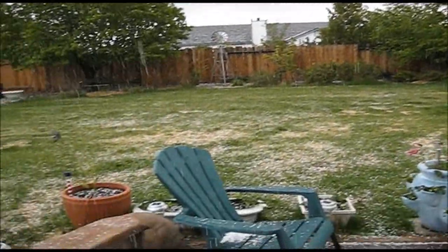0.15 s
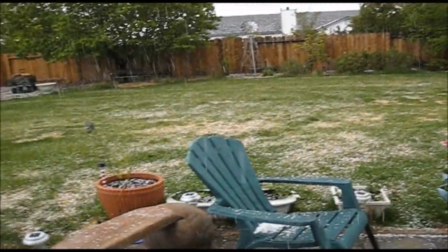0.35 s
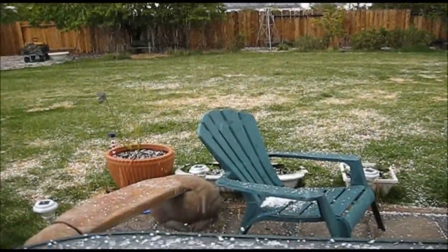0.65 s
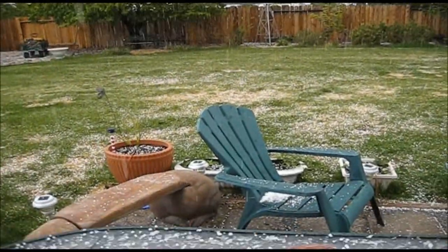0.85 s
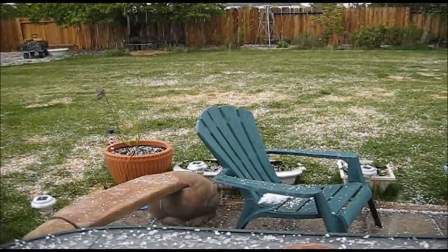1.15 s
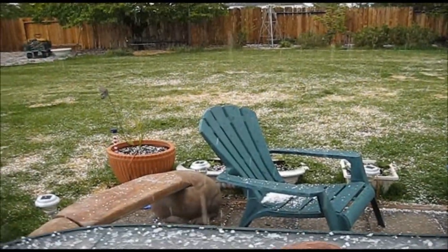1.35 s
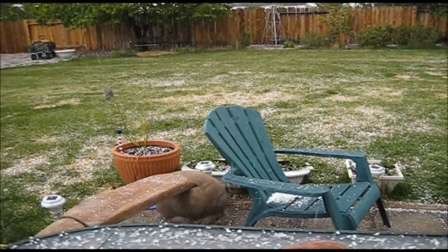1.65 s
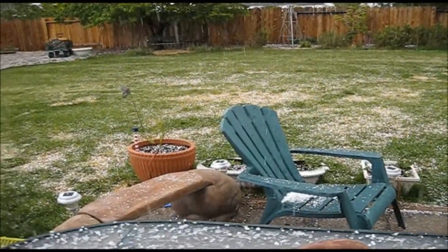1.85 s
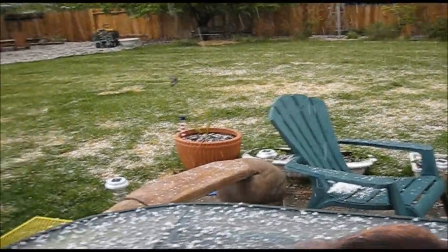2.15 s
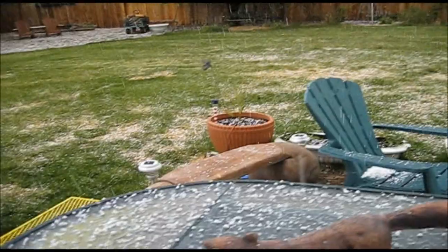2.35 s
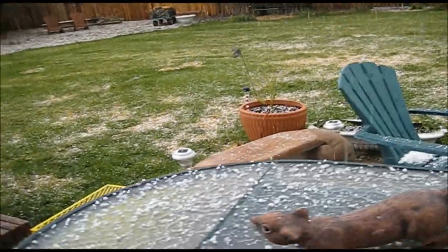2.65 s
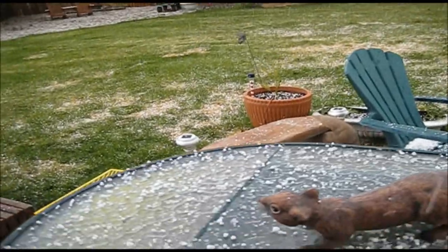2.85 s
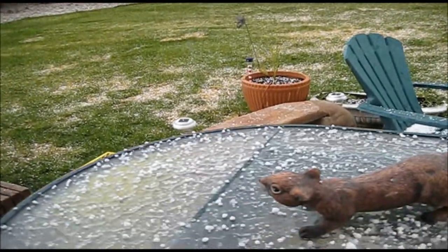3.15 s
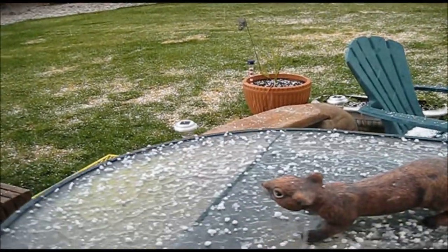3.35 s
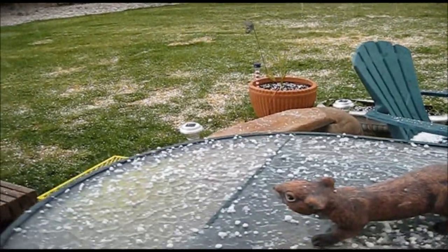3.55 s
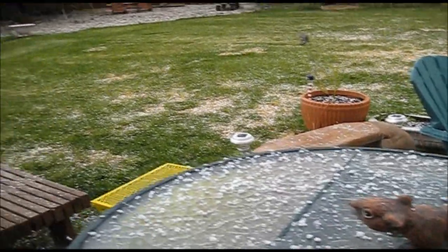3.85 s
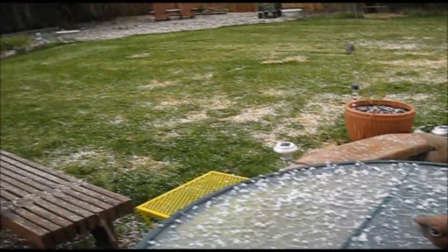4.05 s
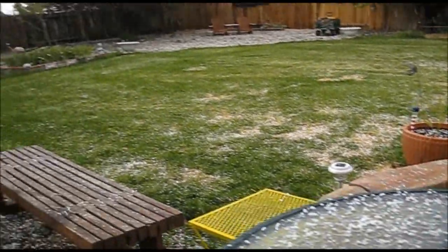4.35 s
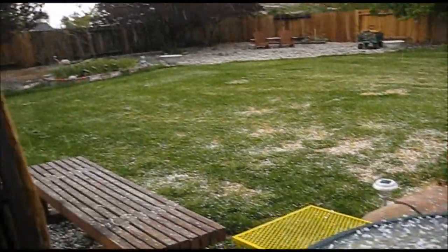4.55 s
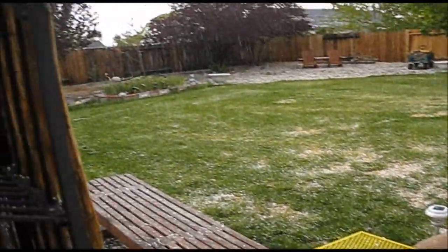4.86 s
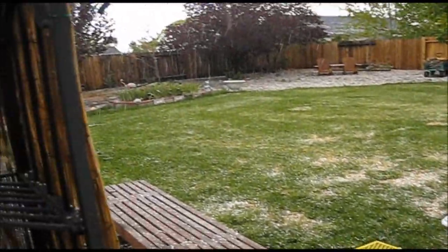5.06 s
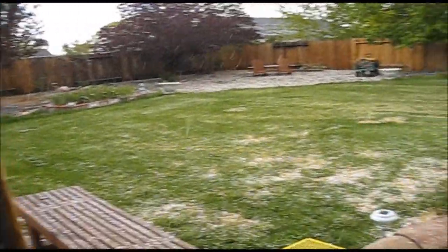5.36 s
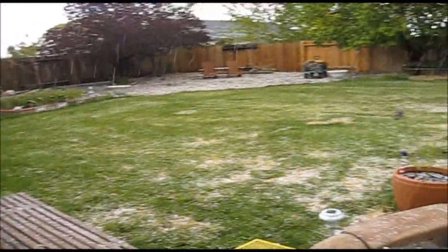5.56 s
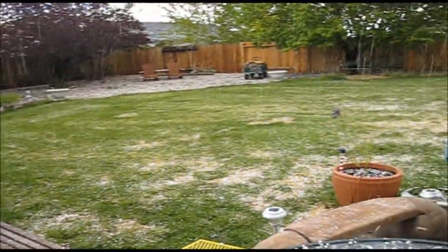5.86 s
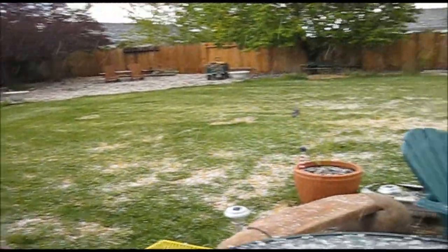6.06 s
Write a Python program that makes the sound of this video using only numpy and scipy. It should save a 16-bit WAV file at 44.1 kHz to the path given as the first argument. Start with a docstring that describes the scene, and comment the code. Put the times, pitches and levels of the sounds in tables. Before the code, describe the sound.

Ice pellets patter and tick on a patio table and garden furniture over the even hiss of hail on a lawn.

```python
"""Small hail on a back yard

Countless distant pellets hiss on the lawn; closer ones patter on the patio, clink on gravel, tap the fence.
Near stones click and crack. Some ring a pot, glass, tile or metal, thump, knock on furniture or shatter.
A limiter ducks the mix after each loud click; the treble has a narrow notch."""
import sys
import numpy as np
from scipy import signal
from scipy.fft import rfft, irfft, next_fast_len
from scipy.io import wavfile
from scipy.ndimage import uniform_filter1d, minimum_filter1d, map_coordinates

SR = 44100
rng = np.random.default_rng(int(sys.argv[2]) if len(sys.argv) > 2 else 0)


def waveform_to_disk(signal):
    """Save audio, clipped to [-1, 1], as 16-bit WAV at the path in sys.argv[1]."""
    frames = np.transpose(np.atleast_2d(signal))
    scaled = np.clip(frames, -1, 1) * 32767
    samples = np.round(scaled).astype(np.int16)
    wavfile.write(sys.argv[1], SR, samples)


N = 273420

# Shower strength. Each row: time in seconds, relative lawn hiss in dB, relative ice fizz in dB.
SHOWER_LEVELS = [(0.0, -28, -30), (1.47, -27, -31), (2.17, -28, -30), (3.02, -28.5, -31.5),
                 (3.35, -27.5, -27.5), (3.61, -27.5, -34), (5.02, -28.5, -31), (6.2, -28, -31.5)]
# Spectra of lawn hiss, ice fizz and impacts. Each row: frequency in Hz, gain in dB.
LAWN_SPECTRUM = [(20, -17.5), (60, -14.5), (150, -13), (300, -8), (600, -3.5), (1000, -1), (2500, 1.5),
                 (4500, -1), (7000, -6.5), (10000, -8.5), (16000, -22)]
FIZZ_SPECTRUM = [(2000, -23), (6000, 0), (9000, -5.5), (11700, 3), (13500, -5.5), (16000, -17)]
IMPACT_SPECTRUM = [(20, -8), (100, -1), (500, -2), (2000, 1.5), (7000, 3), (12000, 2), (13500, -1.5),
                   (16000, -14.5)]
# Loudest near stones. Each row: start in seconds, click pitch in Hz, relative click and crack levels in dB.
NEAR_STONES = [(.261, 4100, -18.5, -11), (.341, 4580, -17.5, -20), (.42, 5960, -25, -12),
               (.648, 5100, -23, -19), (.6845, 3760, -11.5, -13.5), (.7866, 5000, -21, -22),
               (.8255, 4640, -18, -9), (.9256, 4540, -11.5, -21), (.945, 5500, -20, -11.5),
               (.9905, 3700, -20, -30), (1.195, 4800, -17, -11.5), (1.372, 5100, -31, -11.5),
               (1.4225, 5700, -21, -15), (1.487, 4600, -22, -11), (1.531, 4800, -17, -16),
               (1.711, 4600, -37, -14.5), (1.865, 4500, -41, -17), (1.9965, 6700, -15, -12.5),
               (2.122, 5000, -18, -10.5), (2.171, 5600, -25, -11), (2.219, 4970, -21, -10.5),
               (2.2424, 4170, -18, -9), (2.3128, 5100, -15, -23), (2.339, 4940, -14.5, -34),
               (2.38, 4870, -18.5, -33), (2.4256, 4940, -13.5, -10.5), (2.436, 4900, -18, -22),
               (2.7437, 4800, -24, -9), (2.834, 4830, -15, -12), (3.057, 4600, -28, -18),
               (3.3915, 4500, -11, -13), (3.5408, 4850, -17, -9.5), (3.631, 4140, -7.5, -12),
               (3.70, 4800, -34, -8.5), (3.7542, 4560, -12.5, -16.5), (3.9685, 5000, -22, -17.5),
               (4.0447, 4900, -16.5, -18.5), (4.238, 4750, -16.5, -32), (4.317, 4800, -18, -12),
               (4.345, 4020, -17, -17), (4.4864, 4480, -17.5, -21), (4.6484, 4600, -11, -13),
               (4.762, 4580, -10, -8), (4.813, 5300, -23, -15.5), (4.883, 5300, -17, -12),
               (5.094, 5000, -20, -17), (5.206, 5800, -12, -18.5), (5.9124, 4700, -13.5, -13.5),
               (6.088, 4650, -13.5, -16), (6.125, 5000, -15, -16)]
# Stones that ring something. Each row: start in seconds, object struck, level in dB.
RING_STRIKES = [(.405, "glass", -19), (.475, "tile", -18), (.543, "glass", -16), (.70, "glass", -21),
                (1.195, "pot", -18.5), (2.803, "tile", -18), (3.729, "metal", -23), (3.857, "metal", -18.5),
                (4.345, "glass", -16), (5.292, "pot", -18.5), (5.489, "glass", -17), (5.672, "metal", -14)]
# One mode per object. Each entry: pitch in Hz, T60 in seconds.
RING_MODES = {"glass": (11600, 0.12), "tile": (6800, .07), "metal": (4680, 0.062), "pot": (2520, 0.092)}
# Thumps of the closest stones. Each row: start in seconds, relative level in dB.
LOW_THUMPS = [(0.686, -19), (1.713, -25), (1.806, -22), (2.835, -26), (3.391, -26), (3.63, -18),
              (4.762, -21), (6.126, -17)]
# Dull knocks on wood and plastic. Each row: start in seconds, pitch in Hz, level in dB.
FURNITURE_KNOCKS = [(.71, 560, -21.5), (1.585, 960, -24.5), (1.972, 610, -24), (2.581, 930, -21.5),
                    (2.635, 960, -21.5), (3.263, 790, -19.5), (3.63, 740, -19), (3.859, 990, -24),
                    (6.022, 1060, -23.5)]
# Stones that shatter and skitter. Each row: start in seconds, pitch in Hz, relative level in dB.
SHATTERS = [(.75, 11100, -19), (1.098, 11200, -17), (1.972, 3980, -19), (1.993, 10500, -22),
            (2.172, 11300, -15), (2.612, 3280, -19), (3.70, 10700, -17), (3.957, 3070, -23),
            (5.556, 10300, -19.5)]


def amp(db):
    """Decibels to gain."""
    return 10 ** (np.asarray(db) / 20)


def unit_rms(x):
    """Each row scaled to rms 1."""
    return x / np.sqrt(np.mean(x ** 2, axis=-1, keepdims=True) + 1e-20)


def filtered(x, response):
    """x times a frequency response."""
    n = x.shape[-1]
    padded = next_fast_len(n + n // 4)
    return irfft(rfft(x, padded) * response(np.fft.rfftfreq(padded, 1 / SR)), padded)[..., :n]


def coloured(x, spectrum):
    """x through a spectrum of (Hz, dB) points."""
    hz, db = np.transpose(spectrum)
    return filtered(x, lambda f: amp(np.interp(np.log(f + 1), np.log(hz), db)))


def resonance(f, hz, q):
    """Causal band-pass response."""
    return 1j * f * hz / q / (hz * hz - f * f + 1j * f * hz / q)


def wobble(rate_hz):
    """Smooth random curve."""
    knots = rng.standard_normal(int(N * rate_hz / SR) + 4)
    return map_coordinates(knots, [np.arange(N) * rate_hz / SR])


def placed(start_s, sounds):
    """Rows of sound summed at their start times."""
    index = np.round(np.abs(start_s) * SR).astype(int).reshape(-1, 1) + np.arange(sounds.shape[1])
    return np.bincount(index.ravel(), sounds.ravel(), N)[:N]


def contact(blow_s, scatter_db, scatter_t60_s):
    """Impact envelope: the pellet crushes in a short blow, then nearby surfaces scatter the sound."""
    t = np.arange(768) / SR
    crush = np.exp(-(t / blow_s) ** 2)
    scatter = amp(scatter_db - 60 * t / scatter_t60_s)
    return (crush + scatter) * (1 - np.exp(-t / .00027))


def bursts(envelope, hz, q):
    """Rough contacts through one resonance each; a row carries the energy of 3 ms at rms 1."""
    noise = envelope * rng.standard_normal(envelope.shape)
    band = filtered(noise, lambda f: resonance(f, hz, q))
    return unit_rms(band) * np.sqrt(.003 * SR / band.shape[1])


def shower_db(at_s):
    """A heavier shower lands harder: the fizz level about its mean."""
    time_s, _, fizz_db = np.transpose(SHOWER_LEVELS)
    return np.interp(at_s, time_s, fizz_db - fizz_db.mean())


def lawn_hiss():
    """Distant pellets merge into a grainy rush, with fine ice fizzing on top."""
    time_s, lawn_db, fizz_db = np.transpose(SHOWER_LEVELS)
    t = np.arange(N) / SR
    lawn = unit_rms(coloured(rng.standard_normal(N) * amp(1.47 * wobble(400)), LAWN_SPECTRUM))
    fizz = unit_rms(coloured(rng.standard_normal(N) * amp(3.6 * wobble(700)), FIZZ_SPECTRUM))
    lawn *= amp(np.interp(t, time_s, lawn_db) - .5 + 1.19 * wobble(25))
    fizz *= amp(np.interp(t, time_s, fizz_db) - 2.7 + 2.8 * wobble(40))
    return lawn + fizz


def patter(count, spread_db, crack_db, scatter_db, scatter_t60_s):
    """Pellets land at random; hard ones crack more and click less."""
    start_s = rng.uniform(0, N / SR, (count, 1))
    size, hardness, pitch, length = np.clip(rng.standard_normal((4, count, 1)), -2, 2)
    blow = contact(.00037 * np.exp(.5 * length), scatter_db, scatter_t60_s)
    click = amp(-2 * hardness) * bursts(blow, hz=4300 * np.exp(.3 * pitch), q=2.5)
    crack = amp(crack_db + 2.34 * hardness) * bursts(blow, hz=11000 * np.exp(.08 * pitch), q=3.4)
    return placed(start_s, amp(shower_db(start_s) + spread_db * size) * (click + crack))


def gravel_clinks(count, level_db):
    """Pellets on gravel and pots ring for a few milliseconds, each at its own pitch."""
    start_s, hz = rng.uniform((0, 1200), (N / SR, 13000), (count, 2)).T[:, :, None]
    size = np.clip(rng.standard_normal(start_s.shape), -2, 1.5)
    blow = contact(np.full(start_s.shape, .0005), scatter_db=-9, scatter_t60_s=.035)
    return placed(start_s, amp(level_db + 3 * size) * bursts(blow, hz, q=hz / 350))


def far_taps(count, level_db):
    """Dull taps on fence, roof and soil."""
    start_s = rng.uniform(0, N / SR, (count, 1))
    size, pitch = np.clip(rng.standard_normal((2, count, 1)), -2, 2)
    blow = contact(np.full(start_s.shape, .001), scatter_db=-2, scatter_t60_s=.029)
    return placed(start_s, amp(level_db + 3 * size) * bursts(blow, hz=1600 * np.exp(.6 * pitch), q=10))


def lesser_stone_rows(count):
    """Rows like NEAR_STONES, softer, with random size, hardness and pitch."""
    start_s = (np.arange(count) + rng.uniform(-1, 2, count)) * N / SR / count
    size, hardness, pitch = np.clip(rng.standard_normal((count, 3)), -1.3, 1.3).T
    size_db = shower_db(start_s) + 3.5 * size
    click_db = -25 + size_db - 2.5 * hardness
    crack_db = -22.5 + size_db + 2.5 * hardness
    return np.column_stack([start_s, 4700 * np.exp(.2 * pitch), click_db, crack_db])


def near_stones(rows, typical_blow_s):
    """Each stone gives a pitched click, a bright crack of ice and a faint thud."""
    start_s, hz, click_db, crack_db = np.array(rows).T[:, :, None]
    length, crack_pitch = np.clip(rng.standard_normal((len(rows), 2)), -1.5, 1.5).T[:, :, None]
    weight_db = click_db - click_db.mean()
    blow_s = typical_blow_s * np.exp(.2 * length + .12 * weight_db)  # heavier stones crush for longer
    blow = contact(blow_s, scatter_db=-12, scatter_t60_s=.02)
    click = amp(click_db) * bursts(blow, hz, q=2.13)
    crack = amp(crack_db) * bursts(blow, hz=11200 * np.exp(.05 * crack_pitch), q=2.95)
    thud = amp(click_db - 27) * bursts(blow, hz=430, q=.45)
    return placed(start_s, click + crack + thud)


def faint_ping_rows(count, level_db):
    """Rows like RING_STRIKES, with random times and objects."""
    return [(rng.uniform(0, N / SR), rng.choice(list(RING_MODES)), level_db) for _ in range(count)]


def pings(rows, pitch_spread):
    """A hard object rings on one mode, roughened by the pellet's chatter; pitch varies by strike."""
    strikes = [(start_s, db, *RING_MODES[struck]) for start_s, struck, db in rows]
    start_s, db, hz, t60_s = np.array(strikes).T[:, :, None]
    hz = hz * np.exp(pitch_spread * rng.uniform(-1.1, 1, hz.shape))
    t = np.arange(6000) / SR
    chatter_rad = .03 * np.cumsum(rng.standard_normal((len(rows), len(t))), axis=1)
    envelope = amp(db - 60 * t / t60_s) * (1 - np.exp(-t / .00018))
    return placed(start_s, envelope * np.sin(2 * np.pi * hz * t + chatter_rad))


def thumps(rise_s):
    """The closest stones give a low push to what they land on."""
    start_s, db = np.array(LOW_THUMPS).T[:, :, None]
    t = np.arange(2048) / SR
    push = t / rise_s * np.exp(-t / rise_s)
    return filtered(placed(start_s, amp(db) * push), lambda f: resonance(f, hz=303, q=.17))


def rattles(rows, t60_s, q):
    """Knock or shatter: dense contacts die away in one broad resonance."""
    start_s, hz, db = np.array(rows).T[:, :, None]
    t = np.arange(6000) / SR
    noise = rng.standard_normal((len(rows), len(t)))
    body = unit_rms(filtered(noise, lambda f: resonance(f, hz, q) ** 2))
    envelope = amp(db - 60 * t / t60_s) * (1 - np.exp(-t / .0011))
    return placed(start_s, envelope * body)


def scene():
    """Mono mix; farther pellets are softer and more numerous."""
    near = near_stones(NEAR_STONES, typical_blow_s=.0012)
    near += near_stones(lesser_stone_rows(count=105), typical_blow_s=.0009)
    patio = amp(-30) * patter(count=300, spread_db=2.5, crack_db=0, scatter_db=-11, scatter_t60_s=.03)
    gravel = gravel_clinks(count=420, level_db=-31)
    yard = amp(-38) * patter(count=1000, spread_db=5.5, crack_db=2.5, scatter_db=-9, scatter_t60_s=.043)
    shatters = rattles(SHATTERS, t60_s=.14, q=1.5)
    impacts = coloured(near + patio + gravel + yard + shatters, IMPACT_SPECTRUM)
    taps = far_taps(count=600, level_db=-40)
    knocks = rattles(FURNITURE_KNOCKS, t60_s=.053, q=.9)
    rings = pings(RING_STRIKES, pitch_spread=.014)
    rings += pings(faint_ping_rows(count=12, level_db=-25), pitch_spread=.21)
    return (lawn_hiss() + impacts + taps + rings + thumps(rise_s=.00045) + knocks)[None]


def limiter(x, ceiling_db, attack_s, hold_s, release_s):
    """Gain drops fast on a loud burst, holds, then recovers."""
    rms = np.sqrt(np.abs(uniform_filter1d(x * x, size=24)))
    target_gain = np.minimum(1, amp(ceiling_db) / (rms + 1e-9))
    hold_samples = int(hold_s * SR)
    held_gain = minimum_filter1d(target_gain, hold_samples, origin=(hold_samples - 1) // 2)

    def lagged(tau_s):
        pole = np.exp(-1 / (tau_s * SR))
        return 1 + signal.lfilter([1 - pole], [1, -pole], held_gain - 1)

    return x * np.minimum(lagged(attack_s), lagged(release_s))


def record(dry):
    """Limiter, soft clip, treble notch, band limit."""
    limited = limiter(dry, ceiling_db=-6.5, attack_s=.0004, hold_s=.024, release_s=.008)
    clipped = limited / (1 + np.abs(limited / .85) ** 4) ** (1 / 4)
    notched = filtered(clipped, lambda f: 1 - resonance(f, hz=7896, q=4.52))
    return filtered(notched, lambda hz: hz < 15900)


dry = scene()
out = record(dry)
waveform_to_disk(out)
```